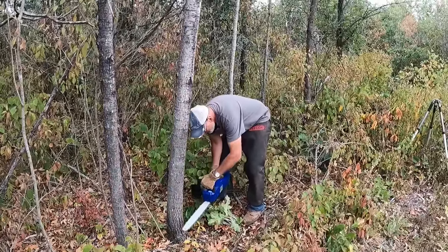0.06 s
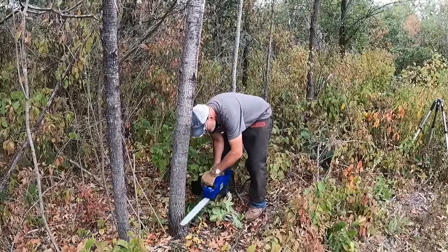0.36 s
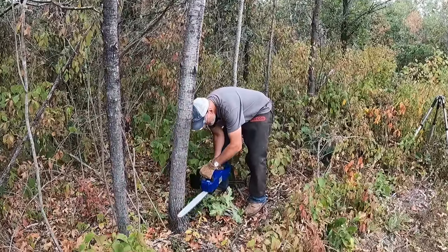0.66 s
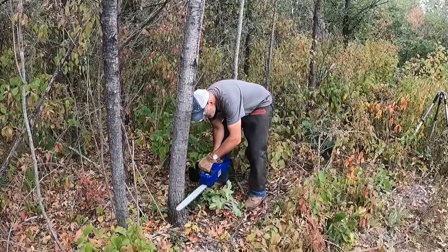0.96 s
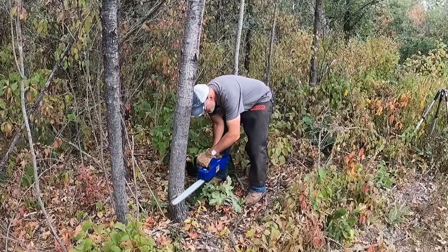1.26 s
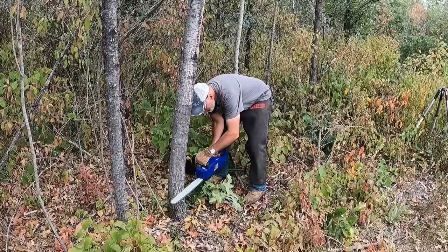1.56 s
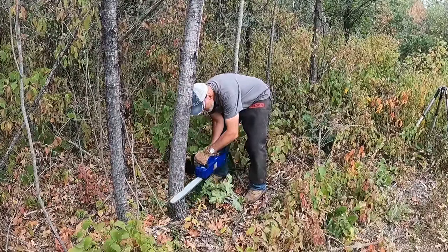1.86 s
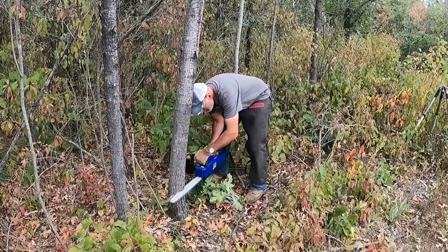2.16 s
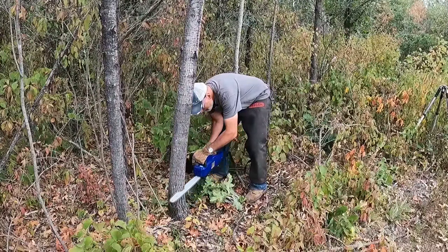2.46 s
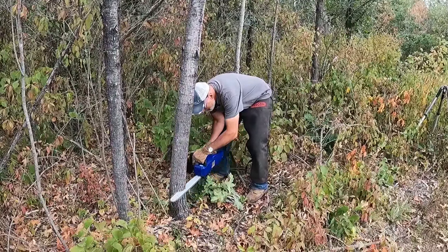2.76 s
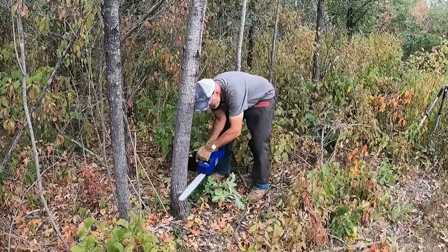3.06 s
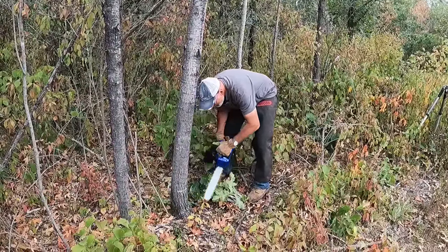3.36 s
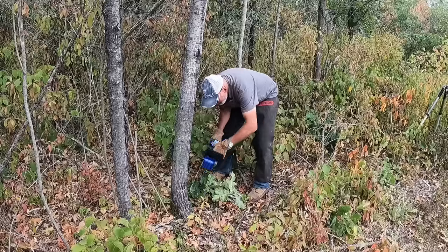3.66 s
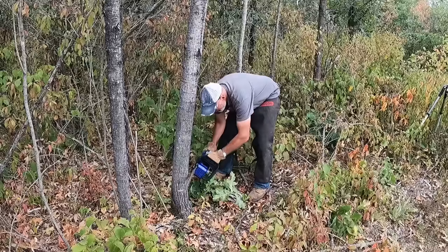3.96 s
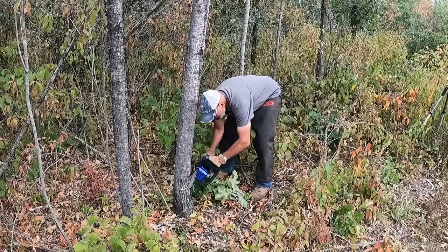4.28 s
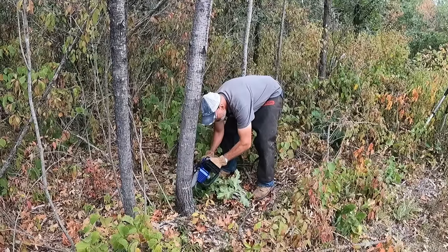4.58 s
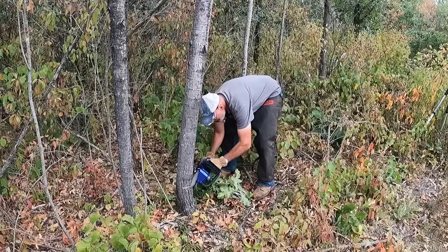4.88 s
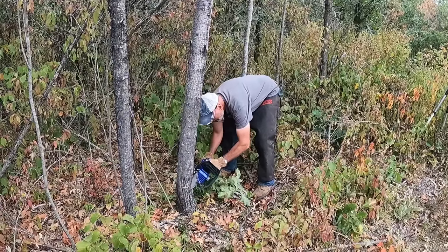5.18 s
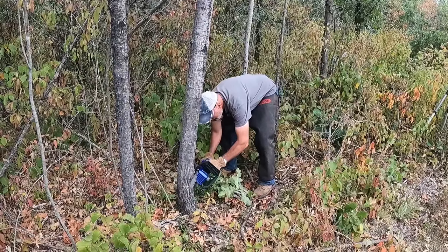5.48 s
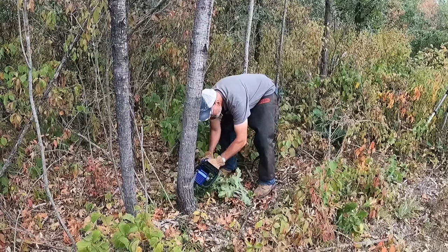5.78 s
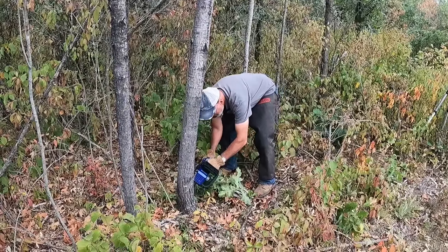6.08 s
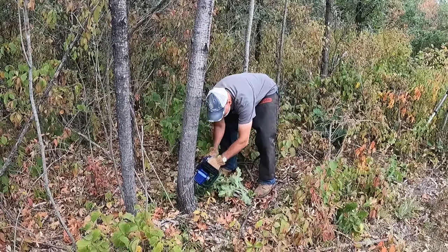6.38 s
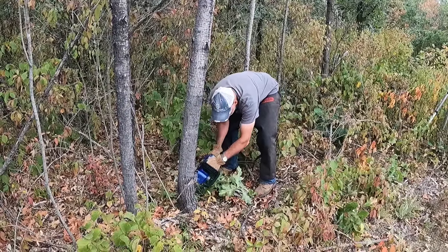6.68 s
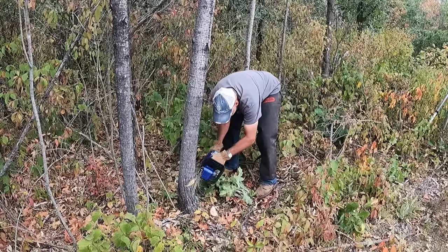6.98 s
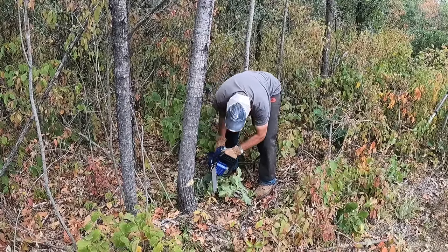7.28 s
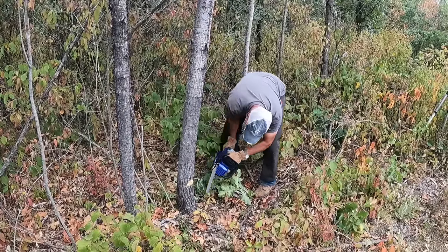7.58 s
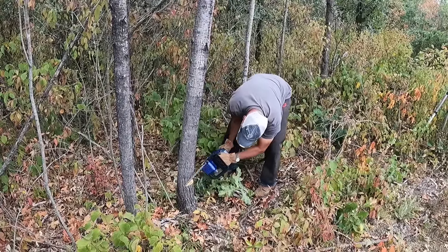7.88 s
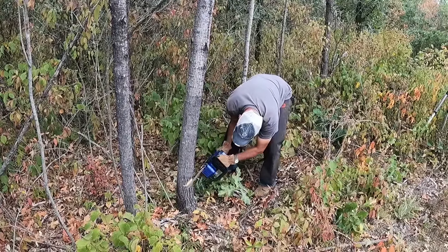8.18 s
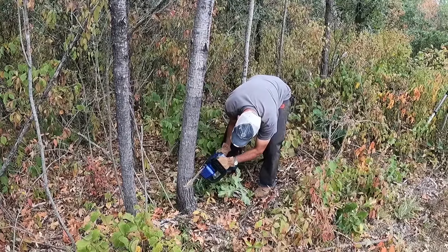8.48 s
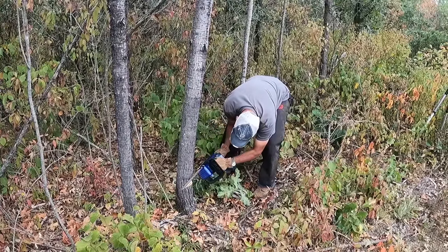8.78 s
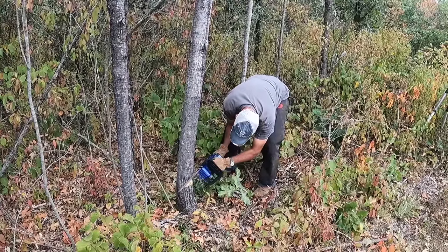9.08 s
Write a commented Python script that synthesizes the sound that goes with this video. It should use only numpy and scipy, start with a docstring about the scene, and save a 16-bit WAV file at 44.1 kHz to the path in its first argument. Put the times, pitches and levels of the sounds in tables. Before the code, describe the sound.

Dry leaves crunch and twigs click between runs of an electric chainsaw that whines, rattles and hisses through a thin trunk outdoors.

```python
"""Cordless chainsaw at the edge of a wood.

A few metres away the saw makes two cuts into a thin trunk and starts up for a third. Each time the
chain jerks into motion and whines up; its links strike sprocket and bar, driving the resonances of
the housing, and the cutters hiss through the wood. The saw is turned over after the first cut.
In the pauses dry leaves rustle underfoot, and twigs and the saw's handle click."""
import sys
import numpy as np
from scipy import signal
from scipy.fft import rfft, irfft
from scipy.io import wavfile
from scipy.ndimage import uniform_filter1d

SR = 44100
rng = np.random.default_rng(int(sys.argv[2]) if len(sys.argv) > 2 else 0)


def wav_out(sig):
    """Save sig, one row per channel (or a flat mono array), as 16-bit PCM at SR to the path in sys.argv[1]."""
    wavfile.write(sys.argv[1], SR, np.round(np.clip(np.atleast_2d(sig).T, -1, 1) * 32767).astype(np.int16))


N = 403074
TURN_OVER_S = 3.9
START_RATE = 196   # chain speed at take-up; every chain rate is in links per second

# Response of bar and housing in each posture. Each row: frequency in Hz, relative level in dB.
BODY_UPRIGHT = [(110, -47), (180, -25.5), (216, -13.5), (293, -16), (540, -9), (713, -11.5), (929, 3.5),
                (1130, -3.5), (1470, -4), (1670, -17), (1920, -7.5), (2140, -18.5), (2390, -7.5),
                (2910, -4.5), (5000, -17), (6500, -71), (11000, -120)]
BODY_TURNED = [(110, -54), (180, -28.5), (248, -13.5), (392, -20.5), (490, -9), (754, -10), (831, -4),
               (867, 0), (996, -0.5), (1160, -12), (1580, -17), (1840, -11.5), (2170, -15.5), (2330, -8),
               (2790, -1.5), (4230, -17), (5000, -18.5), (6500, -40), (11000, -120)]
# Runs of the saw. Each row: times in seconds of trigger pull, chain take-up, entry into the wood,
# trigger release and standstill, then relative levels in dB of clatter and hiss.
CUTS = [(0.651, 0.752, 1.256, 3.125, 3.372, -17, -25), (4.415, 4.508, 5.06, 7.005, 7.225, -17, -23),
        (8.269, 8.353, 9.8, 9.3, 9.5, -16, -23)]


def from_db(db):
    """Amplitude ratio of a level in decibels."""
    return 10 ** (np.asarray(db) / 20)


def rms_one(x):
    """Normalisation to unit power."""
    return x / np.sqrt(np.mean(x ** 2) + 1e-20)


def peak_one(x):
    """Normalisation to unit peak."""
    return x / np.abs(x).max()


def clock():
    """Time of every sample in seconds."""
    return np.arange(N) / SR


def during(start, end, fade_s):
    """Trapezoidal window: 1 between start and end, 0 outside."""
    t = clock()
    return np.clip(np.minimum(t - start, end - t) / fade_s, 0, 1)


def add(out, start_s, sound):
    """Superposition of a sound at its starting time."""
    start = max(round(start_s * SR), 0)
    out[start:start + len(sound)] += sound[:N - start]


def gain_at(spectrum, hz):
    """Frequency response interpolated in octaves, falling 36 dB per octave beyond its ends."""
    known_hz, db = np.array(spectrum).T
    octave, known = np.log2(np.maximum(hz, 1)), np.log2(known_hz)
    beyond = np.abs(octave - np.clip(octave, known[0], known[-1]))
    return from_db(np.interp(octave, known, db) - np.minimum(36 * beyond, 70))


def colour(x, spectrum, size=4096):
    """Minimum-phase filter of the given spectral shape; white noise keeps its power."""
    cepstrum = irfft(np.log(gain_at(spectrum, np.arange(size // 2 + 1) * SR / size)))
    cepstrum[1:size // 2] *= 2
    cepstrum[size // 2 + 1:] = 0
    response = irfft(np.exp(rfft(cepstrum)))
    return signal.oaconvolve(x, response / np.linalg.norm(response))[:len(x)]


def resonate(x, hz, width_hz):
    """Damped resonator with unit gain at its peak."""
    r = np.exp(-np.pi * width_hz / SR)
    feedback = [1, -2 * r * np.cos(2 * np.pi * hz / SR), r * r]
    return signal.lfilter(np.array([1, 0, -1]) * (1 - r * r) / 2, feedback, x)


def drift(hz):
    """Slow random fluctuation: low-passed noise of unit power."""
    r = np.exp(-40 * np.pi * hz / SR)   # computed at every 20th sample
    slow = signal.lfilter([1], [1, -2 * r, r * r], rng.standard_normal(N // 20 + 4002))[4000:]
    return np.interp(np.arange(N) / 20, np.arange(len(slow)), rms_one(slow))


def grains(per_s, spread_db):
    """Shot noise: random impulses of uneven size, at unit power."""
    sizes = from_db(spread_db * np.minimum(rng.exponential(1, N), 4)) * rng.choice([-1, 1], N)
    return rms_one(sizes * (rng.random(N) < per_s / SR))


def burst(decay_s, size=4096):
    """Exponentially decaying noise."""
    return rng.standard_normal(size) * np.exp(-np.arange(size) / SR / decay_s)


def turned_over():
    """Step function, true once the saw is turned over."""
    return clock() >= TURN_OVER_S


def by_posture(x, upright, turned):
    """Directivity: the saw radiates another spectrum once it is turned over."""
    return np.where(turned_over(), colour(x, turned), colour(x, upright))


def forest_air():
    """Ambient noise; a weak independent part in antiphase between the channels gives it width."""
    # Each row: frequency in Hz, relative spectral density in dB.
    spectrum = [(15, -62), (25, -28), (170, -4), (293, -3), (373, -0.5), (1190, -10.5), (1370, -18),
                (1790, -14.5), (5140, -28.5), (16000, -46)]
    mid, side = (from_db(-54.5) * colour(rng.standard_normal(N), spectrum) for _ in range(2))
    return mid + from_db(-14) * side * np.array([[1], [-1]])


def footwork():
    """Friction underfoot: dry leaves crackle in clumps over the dull scuff of soil; powers add."""
    # Spectra of leaves and soil. Each row: frequency in Hz, relative density in dB.
    leaf_spectrum = [(350, -25), (600, -3.5), (1000, -3.5), (1600, -6.5), (3000, -2), (5200, -5),
                     (8500, -11.5), (12000, -21), (16000, -34)]
    soil_spectrum = [(60, -6), (120, -11), (220, -12), (370, -3), (480, -3), (700, -7), (1200, -13.5),
                     (2500, -17)]
    # Shifts of stance. Each row: start and end in seconds, levels of leaves and soil in dB.
    shifts = [(0, 0.656, -47, -43), (3.336, 4.42, -52, -64), (7.21, 7.552, -46, -75),
              (7.514, 8.275, -42, -62)]
    # Each row: start and length in seconds, levels of leaves and soil in dB at the scuff's height.
    scuffs = [(-.03, .14, -33, -30.5), (0.023, 0.37, -33.5, -56), (.2, 0.36, -30.5, -35),
              (3.61, 0.3, -47, -50.5), (3.742, 0.43, -53, -40.5), (4.156, 0.55, -39.5, -43),
              (7.42, .16, -38.5, -62), (7.853, 0.21, -38.5, -51)]
    power = np.zeros((2, N))
    for start, end, leaves_db, soil_db in shifts:
        power += from_db([[leaves_db], [soil_db]]) ** 2 * during(start, end, fade_s=0.02)
    for start, length, leaves_db, soil_db in scuffs:
        swell = np.interp(clock(), start + length * np.array([0, 0.35, 1]), [0, 1, 0])
        power += (from_db([[leaves_db], [soil_db]]) * swell) ** 2
    leaf_gain, soil_gain = np.sqrt(power)
    crackle = grains(per_s=1500, spread_db=3.5) * from_db(1.8 * drift(30))
    leaves = colour(rms_one(crackle + 0.44 * rng.standard_normal(N)), leaf_spectrum)
    return leaf_gain * leaves + soil_gain * colour(rng.standard_normal(N), soil_spectrum)


def snaps():
    """Impulse response of twigs and handle: a broad crack, a brief ring and a duller knock."""
    # Each row: time in seconds, level in dB, ring frequency in Hz, relative knock level in dB.
    clicks = [(.122, -23, 360, -9), (.246, -11, 790, -20), (.292, -6, 940, -18), (.307, -11, 1500, -2),
              (0.33, -17, 1250, -12), (.356, 1.5, 4900, -12), (.360, 2.5, 3880, -15),
              (.604, -20.5, 1460, -19), (3.957, 1.5, 3330, -7.5), (4.013, -10, 3570, -29),
              (4.019, -10, 3150, -21), (4.232, -31.5, 420, -9), (7.320, -23, 3237, -21),
              (7.611, -10.5, 7960, -21), (7.866, -9.5, 3750, -27), (7.877, -10.5, 3300, -18),
              (7.924, -23, 3100, -11), (8.024, -20.5, 2270, -25), (8.049, -22, 4380, -19),
              (8.087, -14, 3000, -15), (8.140, -15.5, 3060, -18), (8.233, -35, 3045, -19)]
    # Each row: frequency in Hz, relative spectral density in dB.
    crack_spectrum = [(200, -5.5), (600, 3.5), (1500, 0.5), (4000, 3.5), (7000, -8), (11000, -17),
                      (16000, -30.5)]
    out = np.zeros(N)
    for start, db, hz, knock_db in clicks:
        crack = peak_one(colour(burst(decay_s=0.0029), crack_spectrum))
        ring = peak_one(resonate(burst(decay_s=0.0007), hz, width_hz=0.12 * hz))
        knock = peak_one(resonate(burst(decay_s=0.0054), hz=430, width_hz=180))
        snap = peak_one(ring + from_db(-4.5) * crack + from_db(knock_db - 5) * knock)
        add(out, start, from_db(db + 0.1) * snap)
    return out


def groans():
    """Random excitation: strain briefly shakes one resonance of the saw or the trunk."""
    # Each row: start and end in seconds, frequency and bandwidth in Hz, level in dB.
    strains = [(0.647, .76, 1700, 110, -19), (0.656, 0.752, 520, 140, -21), (2.8, 3.02, 135, 60, -41.5),
               (4.46, 4.54, 279.2, 69.95, -25), (6.666, 6.852, 128, 35, -40),
               (8.311, 8.389, 300, 59.6, -23.5)]
    out = np.zeros(N)
    for start, end, hz, width_hz, db in strains:
        length = round((end - start) * SR)
        shake = rms_one(resonate(rng.standard_normal(N // 8), hz, width_hz)[-length:])
        add(out, start, from_db(db) * signal.windows.tukey(length, 0.5) * shake)
    return out


def squeals():
    """Friction-driven oscillation: the rubbing chain keeps one narrow mode of the bar ringing."""
    # Each row: start and end in seconds, frequency in Hz, level in dB.
    rubs = [(2.05, 2.71, 2411, -25.5), (6.594, 6.818, 2406, -17.5)]
    out = np.zeros(N)
    for start, end, hz, db in rubs:
        swell = from_db(db + 3.5 * drift(21)) * during(start, end, fade_s=0.05)
        out += swell * np.sin(2 * np.pi * hz * clock() + 0.61 * drift(39))
    return out


def slaps():
    """Impact excitation: the slack chain hits the bar, mostly as the motor takes it up."""
    # Each row: time in seconds, relative level in dB.
    impacts = [(.657, -3), (.749, 3), (.820, -3), (2.313, -12.5), (4.421, -14), (4.449, 8.5), (4.481, -3),
               (6.208, -3), (7.203, -7.5), (8.277, -2.5), (8.320, -5)]
    force = np.zeros(N)
    for start, db in impacts:
        add(force, start, from_db(db - 7.5) * burst(decay_s=0.0024))
    return by_posture(force, BODY_UPRIGHT, BODY_TURNED)


def chain_speed(drag, taken_up, let_go):
    """At constant power the squared speed grows linearly; wood and brake slow the chain."""
    rate_after_1_s, braking_per_s = 440, 1950
    t = clock()
    driven = np.clip(t, taken_up, let_go)
    free = np.sqrt(START_RATE ** 2 + (rate_after_1_s ** 2 - START_RATE ** 2) * (driven - taken_up))
    loaded = free * (1 - np.interp(driven, *np.transpose(drag)))
    return np.maximum(loaded - braking_per_s * np.maximum(t - let_go, 0), START_RATE / 2)


def at_speed(rate):
    """Crossfade from 0 for a slow chain to 1 for a fast one."""
    return np.clip((rate - 380) / 90, 0, 1)


def cut_controls():
    """Envelopes of the runs: chain rate, depth of the bar (0-1) and the four layers' levels in dB."""
    # Load of the wood, one list per run. Each row: time in seconds, share of the speed lost
    # (negative as the chain races clear).
    drags = [
        [(2.2, -0.00082), (2.68, 0.092), (2.77, -0.0068), (2.98, -0.0074), (3.09, -0.095), (3.125, -0.066)],
        [(5.33, 0), (5.72, 0.093), (5.94, 0.025), (6.17, 0.066), (6.22, 0.27), (6.62, .147), (6.74, 0.17),
         (6.89, .385), (6.99, 0.23)],
        [(8.65, 0), (9.14, 0.052)],
    ]
    # Each gives level changes in dB: with the chain slack, in the surge, in the wood, at standstill.
    clatter_swing = (1, 7.5, 1.33, -19)
    hiss_swing = (-6, 3, 2, -26.5)
    rumble_swing = (-1, 8, 9, -34)
    tone_swing = (-10.5, -4, -1, -38)
    swings = np.array([clatter_swing, hiss_swing, rumble_swing, tone_swing])
    jerk_s, surge_s, bite_s, sink_s, stop_s = 0.009, 0.12, 0.029, 2.3, 0.039
    rumble_db = -57.5
    rate, depth, levels = np.full(N, float(START_RATE)), np.zeros(N), np.full((4, N), -120.)
    for (trigger, taken_up, in_wood, let_go, stands, clatter_db, hiss_db), drag in zip(CUTS, drags):
        running = (clock() >= trigger) & (clock() < stands)
        t = clock()[running]
        jerk = taken_up - 0.032   # just before the chain gathers speed
        slack = np.clip((jerk - t) / jerk_s, 0, 1)
        surge = (1 - slack) * np.exp(-np.maximum(t - jerk, 0) / surge_s)
        biting = during(in_wood, let_go + bite_s, fade_s=bite_s)[running]
        stopping = np.exp((t - stands) / stop_s)
        change_db = swings @ [slack, surge, biting, stopping]
        levels[:, running] = change_db + [[clatter_db], [hiss_db], [rumble_db], [0]]
        rate[running] = chain_speed(drag, taken_up, let_go)[running]
        depth[running] = biting * np.clip((t - in_wood) / sink_s, 0, 1)
    return rate, depth, levels


def trunk_rumble():
    """Forced vibration: the shaken trunk radiates low noise."""
    # Each row: frequency in Hz, relative spectral density in dB.
    spectrum = [(25, -9), (60, -7.5), (100, -3), (135, 3), (190, -5), (300, -17)]
    return colour(rng.standard_normal(N), spectrum)


def trunk_reflection(x, lag_s, sway_s, echo_db):
    """Comb filtering by a short echo off the trunk, whose delay wanders as the bar moves."""
    t = clock()
    return x + from_db(echo_db) * np.interp(t - lag_s - sway_s * drift(0.32), t, x)


def cutters(bite, blows):
    """Modulated noise of tearing chips, returned as a broad hiss and a narrow-band rasp."""
    # Hiss in each posture. Each row: frequency in Hz, relative spectral density in dB.
    hiss_upright = [(2470, -8), (4200, 1), (4670, -16), (5110, -2), (7560, -6), (9090, -4.5),
                    (13500, -16.5), (15100, -21), (16000, -22)]
    hiss_turned = [(2470, -35), (4200, -11), (5080, -0.5), (6350, -4.5), (7390, -2.5), (12900, -12),
                   (15100, -21), (16000, -27)]
    chips = rms_one(bite * rng.standard_normal(N) + from_db(-11.5) * blows)
    chips = trunk_reflection(chips, lag_s=0.00055, sway_s=0.00005, echo_db=-12)
    hiss = by_posture(chips, hiss_upright, hiss_turned)
    rasp = rms_one(resonate(chips, hz=3880, width_hz=100))
    rasp += rms_one(resonate(chips, hz=1886, width_hz=80))
    return from_db(-1) * hiss, from_db(-5.5) * rasp


def bar_ringing(drive):
    """Resonance: the bar's narrow modes pick their own bands out of the drive."""
    # Each row: frequency and bandwidth in Hz, gain in dB.
    modes = [(1800, 78, -7), (2826, 36, -6.5), (5000, 120, -5), (7400, 290, -7)]
    return sum(from_db(db) * resonate(drive, hz, width_hz) for hz, width_hz, db in modes)


def link_blows(links, uneven_db=1.0, play=0.12, scatter=0.05, links_per_lap=40):
    """Impulse train of links on the sprocket; each link's own lag and strength recur every lap."""
    number = np.arange(1, int(links[-1]))
    own_lag, own_strength = rng.standard_normal((links_per_lap, 2))[number % links_per_lap].T
    chance_lag, chance_strength = rng.standard_normal((len(number), 2)).T
    at = np.interp(number + play * own_lag + scatter * chance_lag, links, np.arange(N)).astype(int)
    blows = np.zeros(N)
    blows[at] = from_db(uneven_db * (own_strength + chance_strength)) / np.sqrt(np.gradient(links)[at])
    return rms_one(blows - uniform_filter1d(blows, size=256))


def rough_tone(cycles, rough):
    """Random modulation: a tone wavers in amplitude and phase as the chain flaps."""
    angle = 2 * np.pi * cycles
    return np.sqrt(2) * ((1 + rough * drift(27)) * np.cos(angle) + rough * drift(25) * np.sin(angle))


def overtones(links, rate):
    """Weak higher partials of the drive emerge once the chain has settled and fade with speed."""
    # Each row: multiple of the link rate, relative levels in dB upright and turned over,
    # fall in dB per octave of speed.
    partials = [(3.7, -14, -21, 23), (7, -10.5, -18.5, 7.5), (7.999, -30, -27, 5)]
    turned, octaves = turned_over(), np.log2(np.maximum(rate / 225, 1))
    tones = np.zeros(N)
    for multiple, upright_db, turned_db, fall_db in partials:
        db = np.where(turned, turned_db, upright_db) - fall_db * octaves
        tones += from_db(db) * rough_tone(multiple * links, rough=0.26)
    tones -= resonate(tones, hz=2180, width_hz=330)   # the housing radiates this band poorly
    tones += turned * from_db(8.5) * resonate(tones, hz=2800, width_hz=240)   # the bar's main mode
    settled = np.clip((rate - 197) / 12, 0, 1)
    return settled * tones


def whine(links, rate):
    """Harmonics of the chain meshing with the sprocket swell as they cross the housing's resonances."""
    # Each row: multiple of the link rate, relative level in dB, dB per octave of speed,
    # dB gained when racing, roughness, roughness added when fast but not racing.
    harmonics = [(1, -0.5, -8.5, 11.5, 0.2, .15), (2, 0.64, -2.5, 11.7, 0.27, 0.12),
                 (3, -0.5, .2, 0.5, 0.1, 0.57), (4, 1.5, -7.5, -1, 0.17, .1), (5, -1.5, -19, 0, 0.51, .1)]
    # Response of the housing to a tone in each posture. Each row: frequency in Hz, gain in dB.
    housing_upright = [(190, -35.5), (222, -21), (295, -33), (380, -23.5), (500, -28.5), (610, -30),
                       (715, -35), (805, -23.5), (850, -21), (935, -16), (1020, -23.5), (1170, -27.5),
                       (1300, -23.5), (1460, -24.5), (1580, -29), (1700, -42), (1870, -28.5), (2200, -48)]
    housing_turned = [(220, -38), (320, -35), (400, -37), (490, -26), (610, -33.5), (680, -25.5),
                      (750, -33), (855, -18), (950, -25.5), (1080, -27.5), (1170, -33.5), (1270, -42),
                      (1440, -34), (1680, -39), (1880, -26), (2200, -32)]
    turned, octaves = turned_over(), np.log2(np.maximum(rate / 225, 1))
    fast, racing = at_speed(rate), np.clip((rate - 570) / 60, 0, 1)
    mesh = np.zeros(N)
    for multiple, db, octave_db, racing_db, rough, fast_rough in harmonics:
        hz = multiple * rate
        housing = np.where(turned, gain_at(housing_turned, hz), gain_at(housing_upright, hz))
        gain = housing * from_db(db + octave_db * octaves + racing_db * racing)
        mesh += gain * rough_tone(multiple * links, rough + fast_rough * (fast - racing))
    # A fast chain whips about once per sprocket turn: a sideband just under the third harmonic.
    whip_gain = from_db(np.where(turned, -45, -26.5)) * fast * (1 - 0.7 * racing)
    return mesh + whip_gain * rough_tone((3 - 1 / 7) * links, rough=0.7)


def saw():
    """Source and filter: link blows and rubbing ring bar and housing, amid hiss, rumble and whine."""
    # A fast chain flutters against the bar: links per cycle, swing in dB of the whine and the clatter.
    flutter_settings = (15.2, 1.7, 0.82)
    flutter_links, tone_flutter_db, clatter_flutter_db = flutter_settings
    rate, depth, (clatter_db, hiss_db, rumble_db, tone_db) = cut_controls()
    links, turned = np.cumsum(rate) / SR, turned_over()
    flutter = at_speed(rate) * np.cos(2 * np.pi * links / flutter_links)
    # Every second link carries a cutter; the bites are uneven and surge as the chain goes round.
    bite = from_db(0.99 * np.cos(np.pi * links) + 0.2 * np.cos(2 * np.pi * links / 20) + drift(67))
    blows = link_blows(links)
    drive = rms_one(from_db(-5) * blows + bite * grains(per_s=14000, spread_db=2.5))
    clatter = by_posture(drive, BODY_UPRIGHT, BODY_TURNED)
    clatter *= from_db(clatter_db - 2.5 + clatter_flutter_db * flutter)
    hiss, rasp = from_db(hiss_db) * cutters(bite, blows)
    # Turned over, the bar's modes stand out; deep in the cut the wood damps them.
    ringing = turned * (1 - 0.73 * depth) * bar_ringing(clatter + hiss)
    clatter -= 0.5 * turned * depth ** 2 * resonate(clatter, hz=2780, width_hz=755)
    rumble = from_db(rumble_db) * trunk_rumble()
    tones = from_db(tone_db + tone_flutter_db * flutter) * whine(links, rate)
    tones += from_db(clatter_db) * overtones(links, rate)
    running = sum(during(trigger, stands, fade_s=0.014) for trigger, _, _, _, stands, _, _ in CUTS)
    return running * (clatter + hiss + ringing + depth * rasp + rumble + tones)


def scene():
    """Superposition of sources straight ahead; only the forest air has a little width."""
    return forest_air() + saw() + slaps() + squeals() + groans() + snaps() + footwork()


def record(dry):
    """Soft saturation rounds the highest peaks, and a steep low-pass removes the top."""
    cutoff_hz = 16000
    limited = dry / (1 + dry ** 6) ** (1 / 6)
    return signal.sosfilt(signal.ellip(10, 0.1, 80, cutoff_hz, fs=SR, output="sos"), limited)


dry = scene()
out = record(dry)
wav_out(out)
```